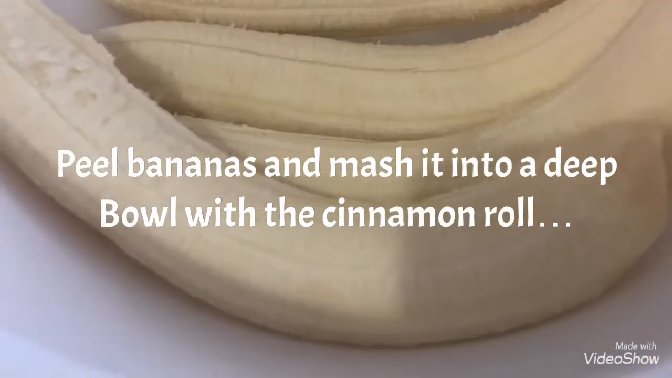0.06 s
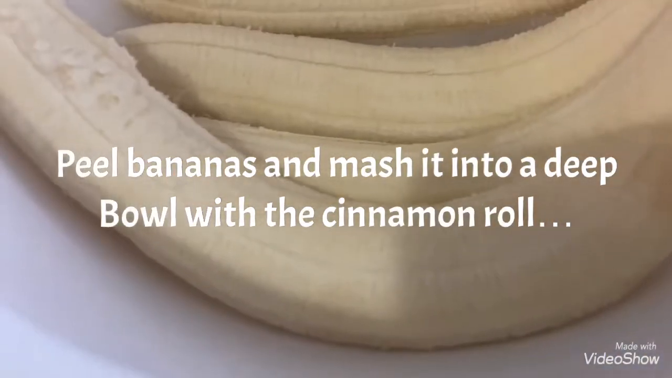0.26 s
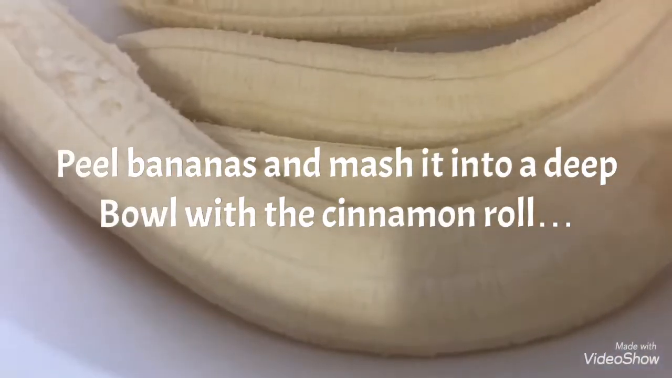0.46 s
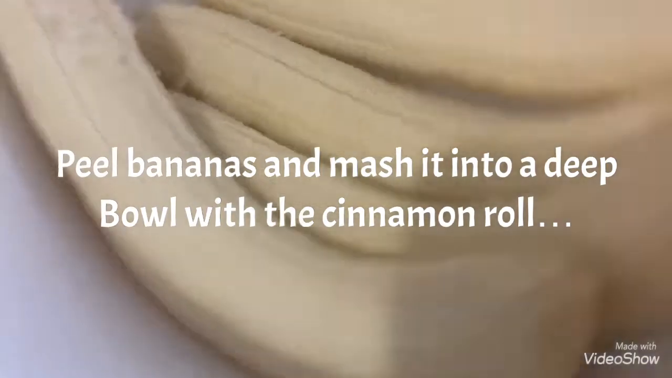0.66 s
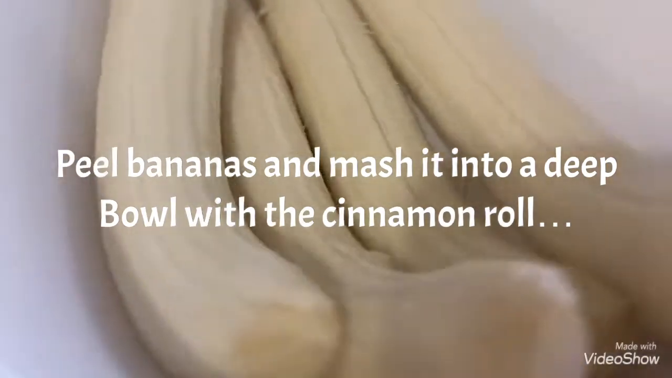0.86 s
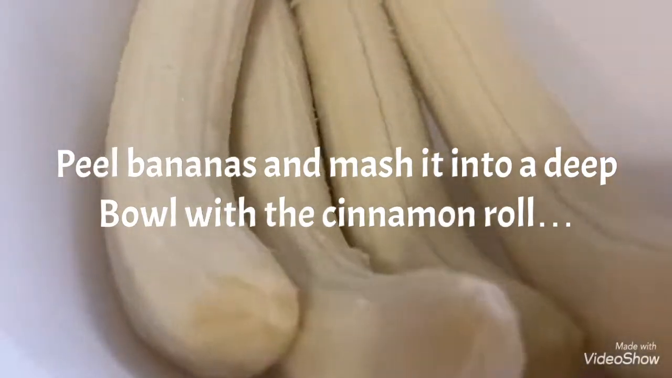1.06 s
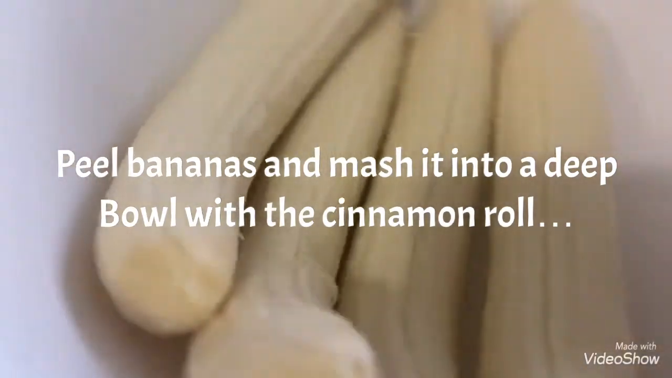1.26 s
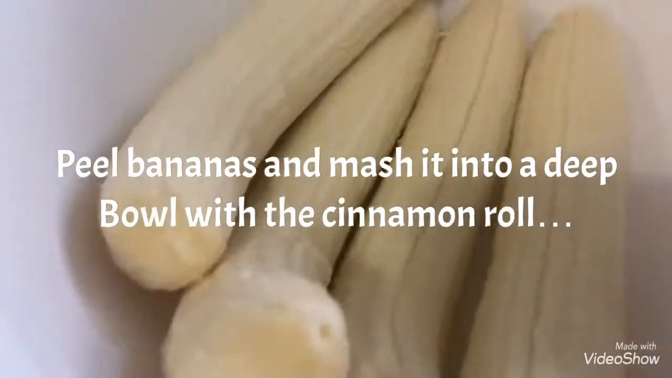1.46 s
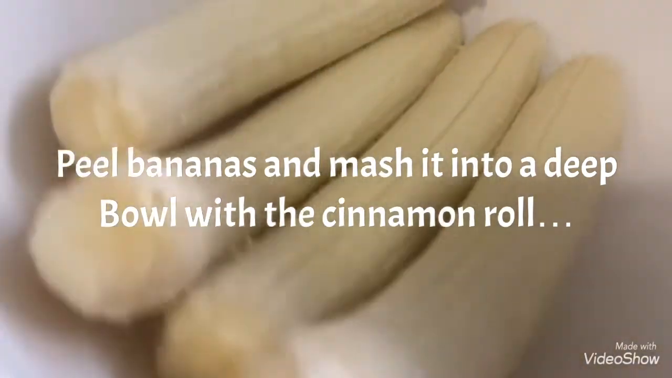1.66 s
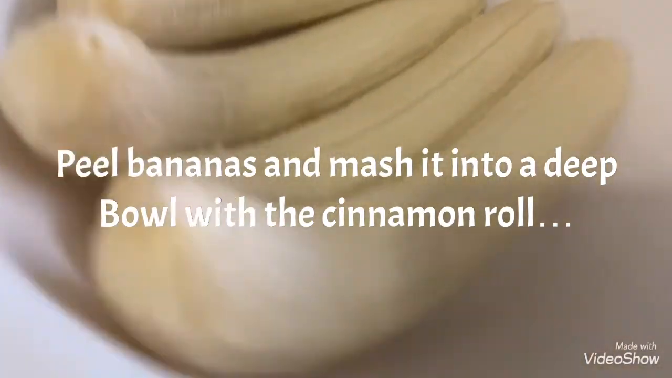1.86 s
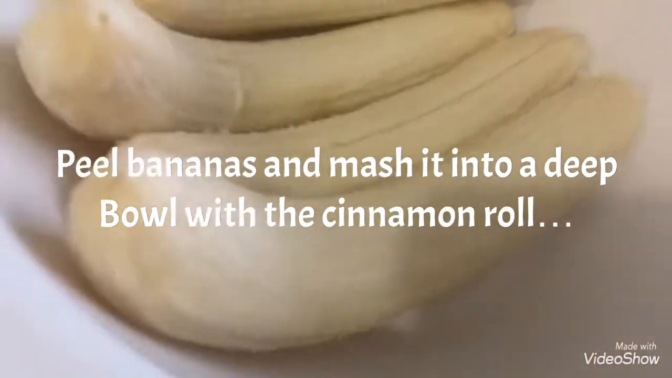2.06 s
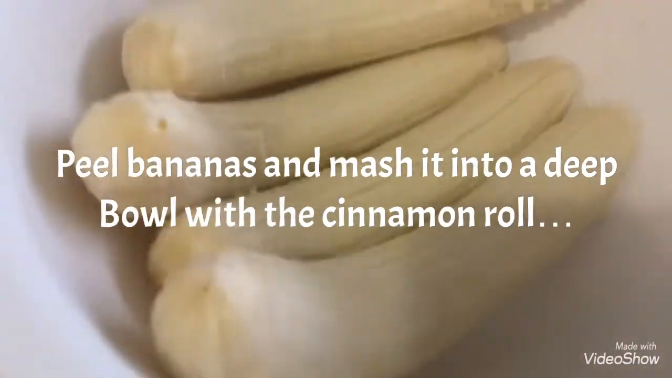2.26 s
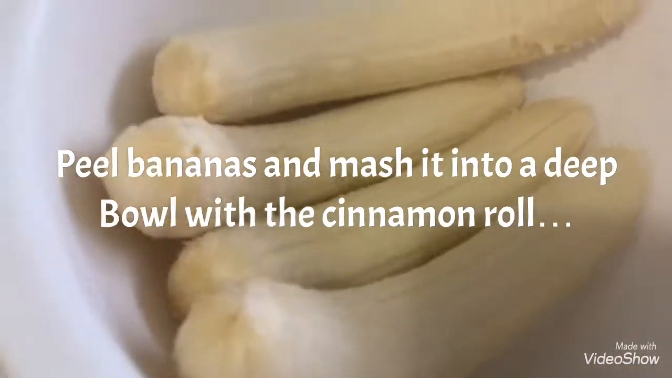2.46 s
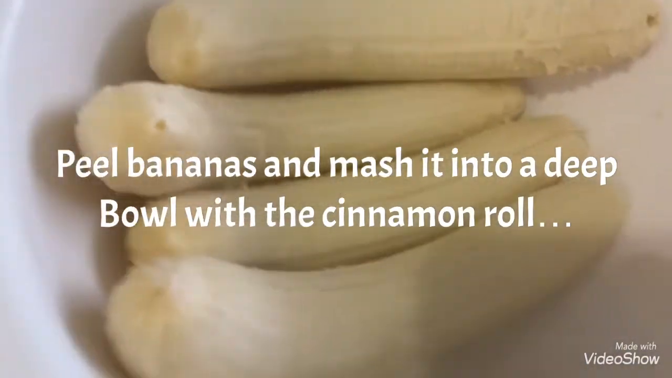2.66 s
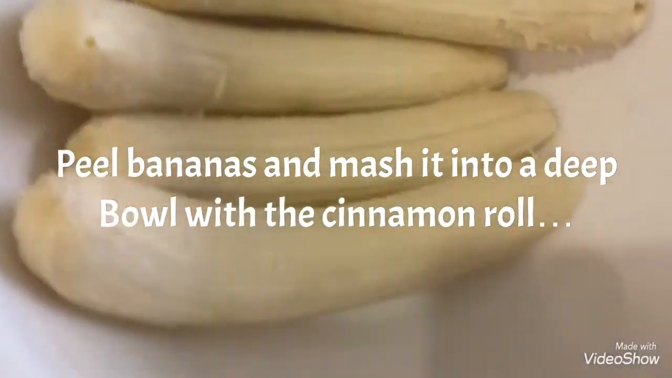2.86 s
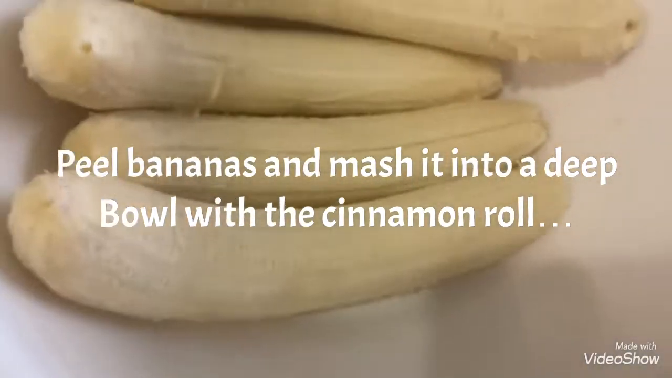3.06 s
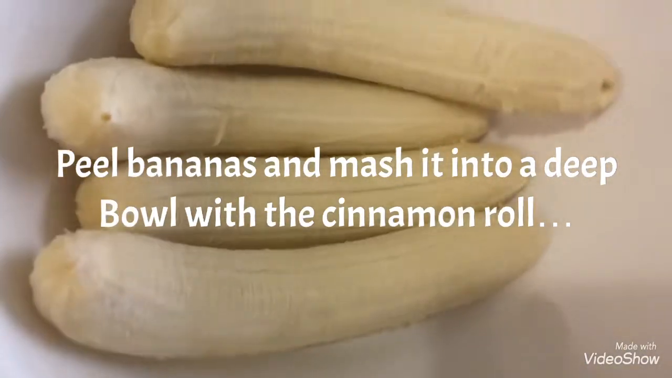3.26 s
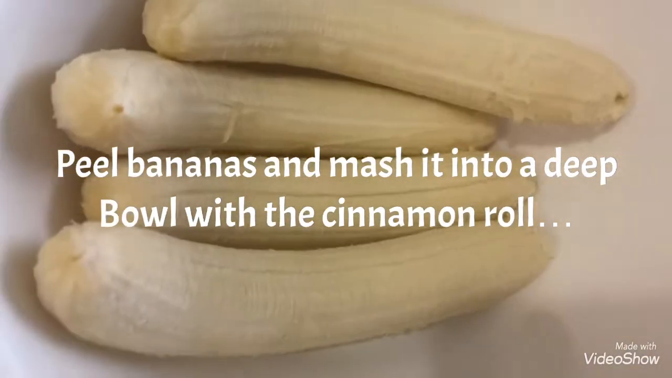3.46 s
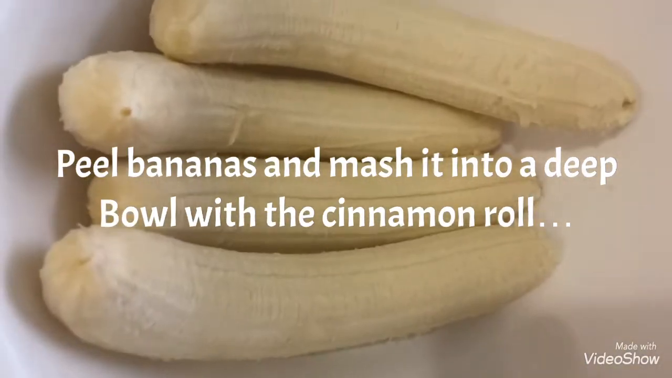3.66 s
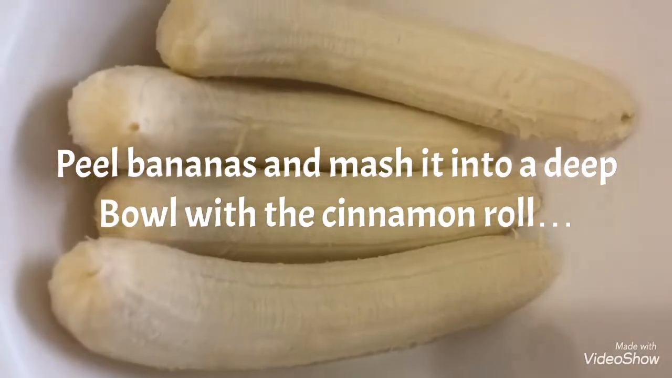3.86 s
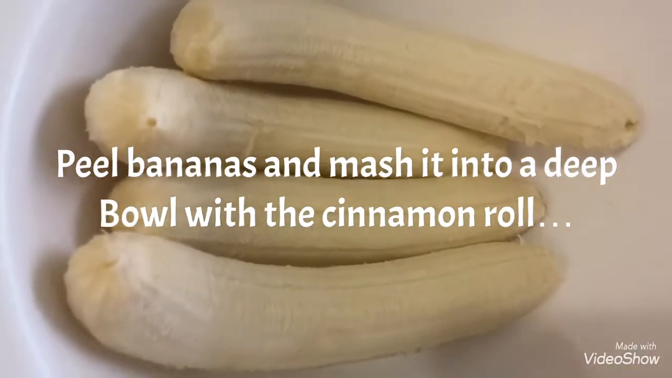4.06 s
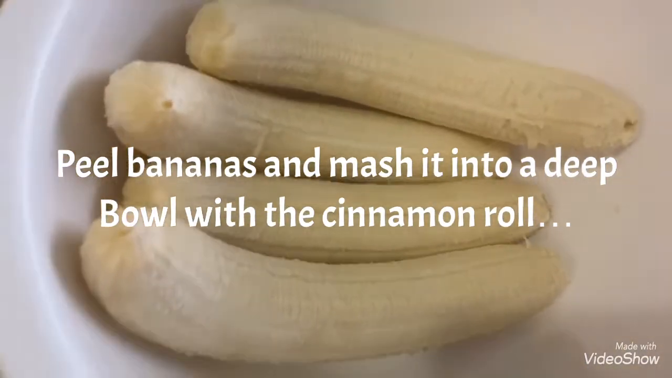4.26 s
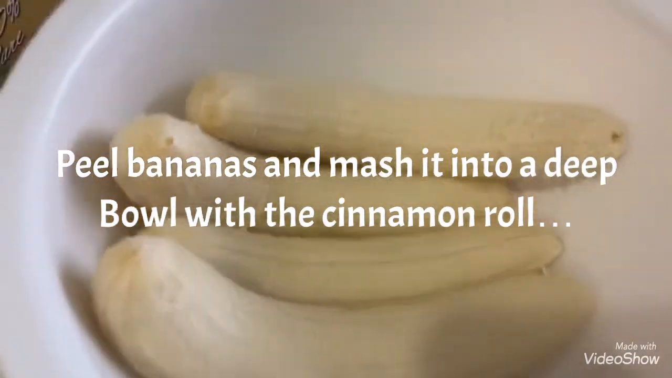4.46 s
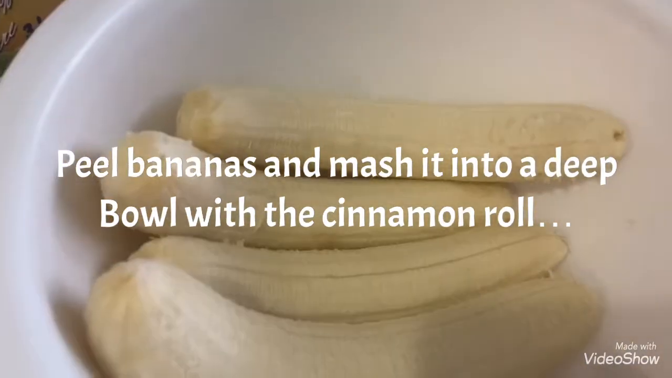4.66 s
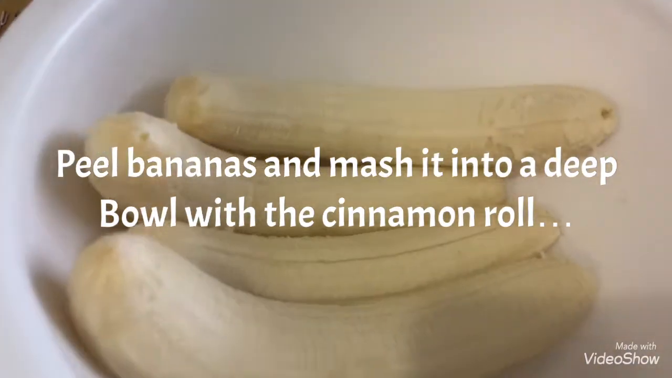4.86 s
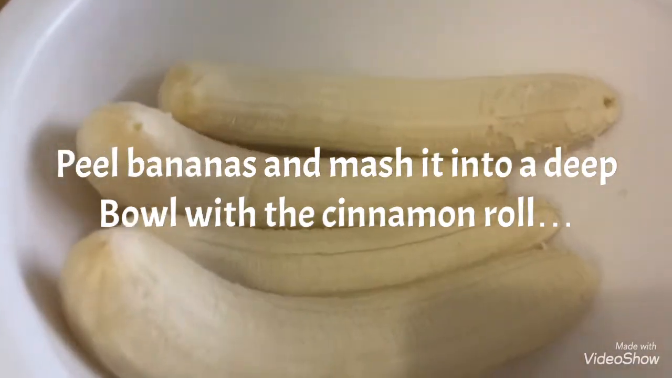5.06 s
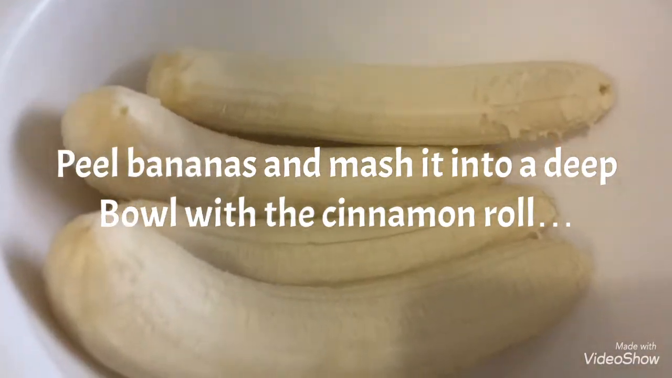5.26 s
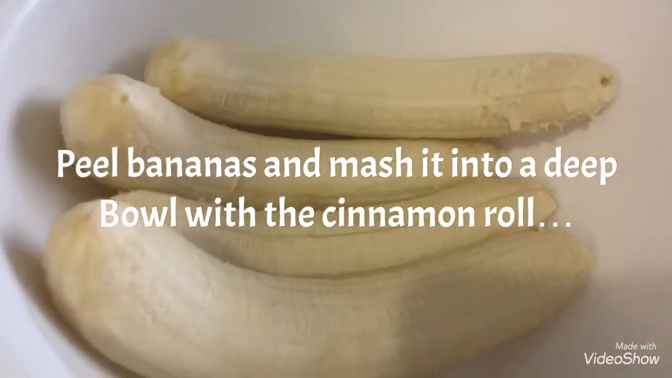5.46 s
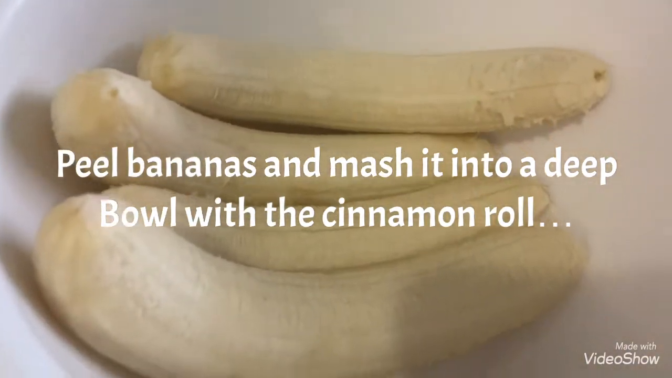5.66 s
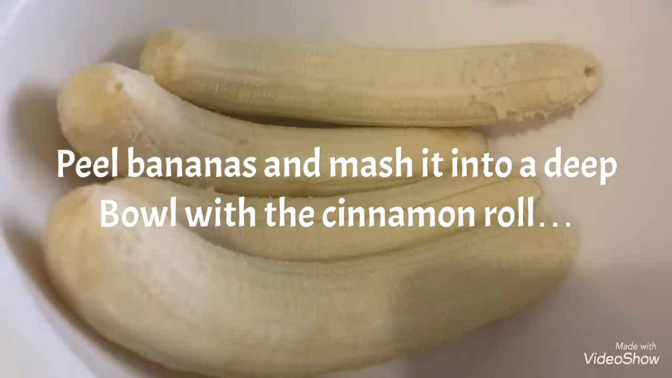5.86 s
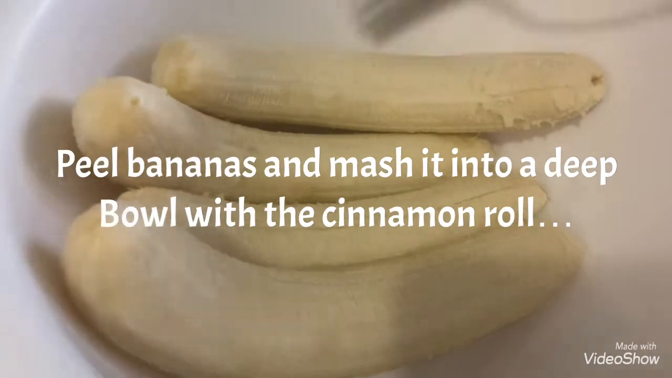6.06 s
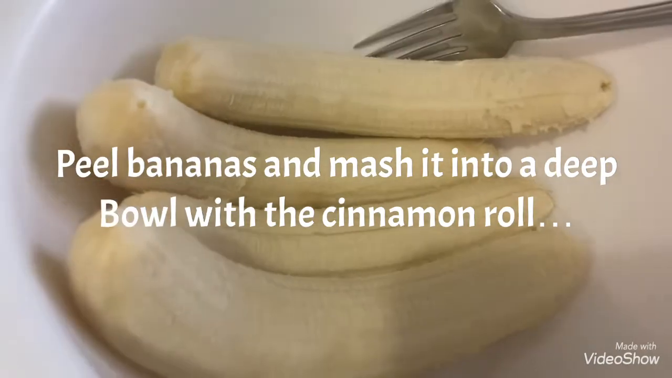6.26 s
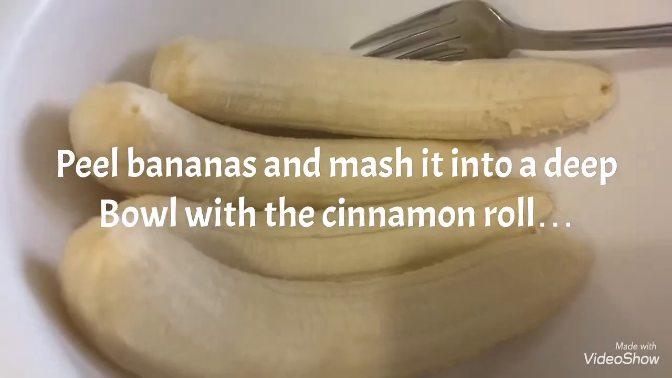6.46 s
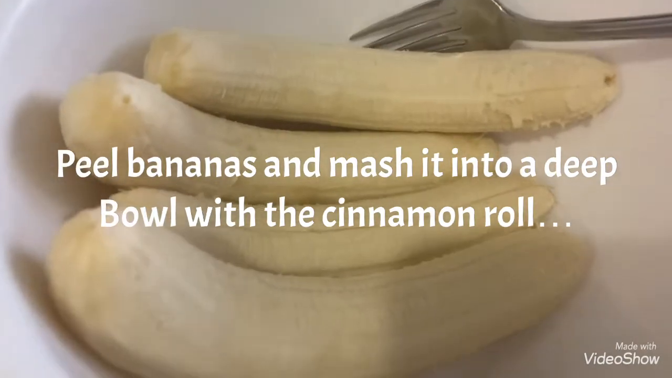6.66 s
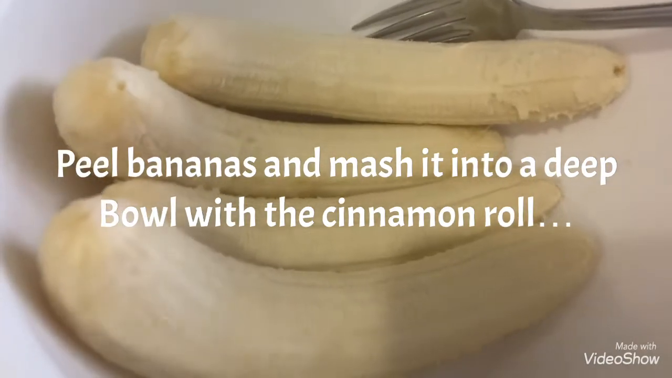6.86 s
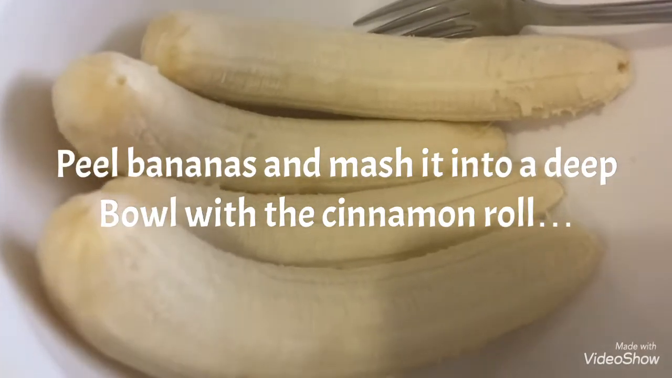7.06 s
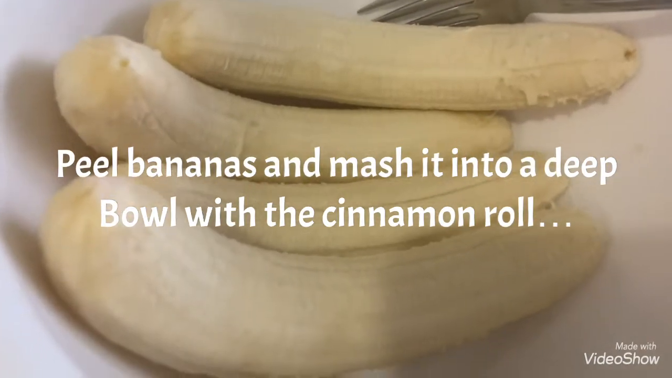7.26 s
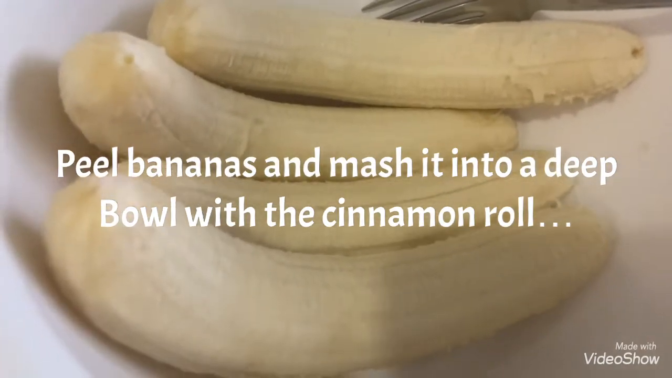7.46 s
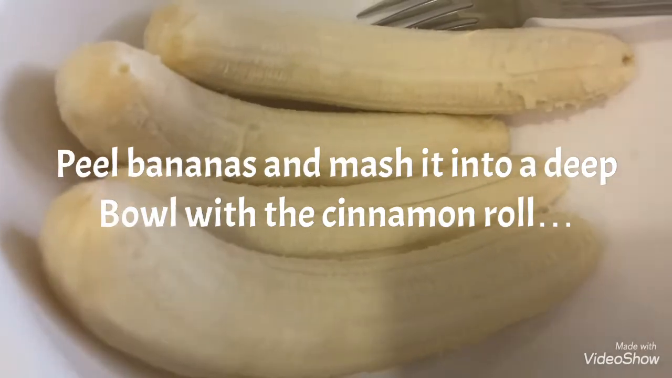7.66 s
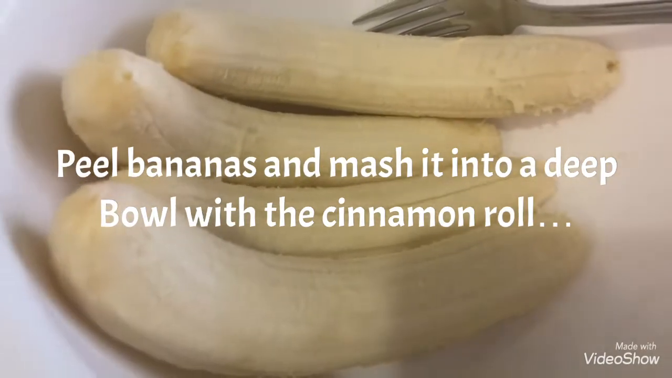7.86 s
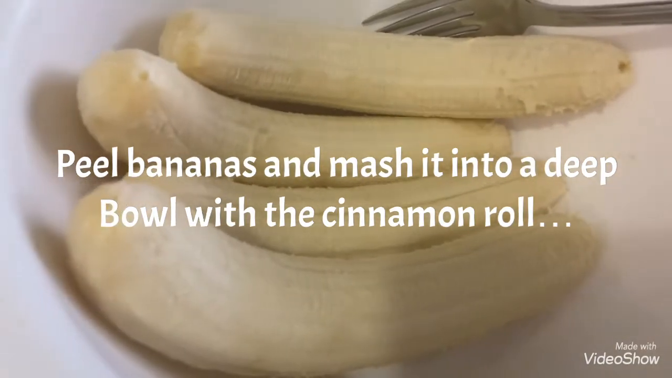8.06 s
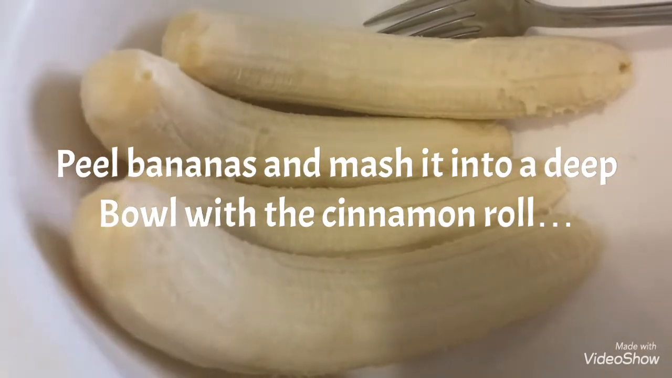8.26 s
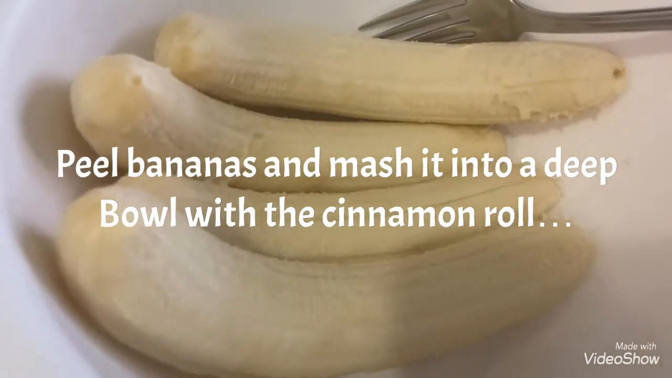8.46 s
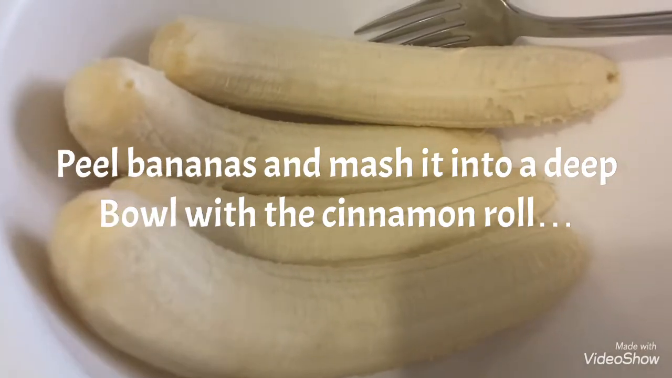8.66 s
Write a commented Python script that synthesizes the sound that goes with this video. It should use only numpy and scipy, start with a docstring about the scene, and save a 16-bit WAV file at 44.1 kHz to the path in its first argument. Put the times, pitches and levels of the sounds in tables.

```python
"""A light bowl is turned and slid on a kitchen counter under a hand-held phone, then a fork is laid in it.
Blows and a stick-slip judder sum a snap, damped bowl modes, a hollow note and a late low note, with echoes;
sliding grit is noise through the same bowl modes, and skin rustle and puffs of hiss are brighter noise.
Underneath lie coloured-noise room rumble and a wandering, refrigerator-like motor hum, heard in stereo."""
import sys
import numpy as np
from scipy import signal
from scipy.fft import rfft, irfft
from scipy.io import wavfile
from scipy.ndimage import uniform_filter1d

SR = 44100
rng = np.random.default_rng(int(sys.argv[2]) if len(sys.argv) > 2 else 0)


def generate_wav(sig):
    """Save sig (samples, or channels by samples) to the path in sys.argv[1] as 16-bit PCM at SR."""
    pcm = np.round(np.clip(np.atleast_2d(sig).T, -1, 1) * 32767).astype(np.int16)
    wavfile.write(sys.argv[1], SR, pcm)


N = 384552  # samples
HZ = np.fft.rfftfreq(N, 1 / SR) + 1e-3  # the offset avoids dividing by zero


def undb(db):
    """Decibels to an amplitude factor."""
    return 10 ** (np.asarray(db) / 20)


def level(x, db):
    """Scale a sound to an RMS level."""
    return x * undb(db) / np.sqrt(np.mean(x ** 2))


def peak(x, db):
    """Scale a sound to a peak level."""
    return x * undb(db) / np.abs(x).max()


def along(table, column=1):
    """Read a table column on a log-frequency axis."""
    table = np.array(table, float)
    return np.interp(np.log(HZ), np.log(table[:, 0]), table[:, column])


def shape(x, gain):
    """Filter a sound by a gain at each frequency."""
    return irfft(rfft(x) * gain, N)


def walk(rate):
    """Random levels held about 1 / rate s and smoothed twice; spread near 1."""
    hold = int(SR / rate)
    steps = np.repeat(rng.standard_normal(N // hold + 1), hold)
    return 1.3 * uniform_filter1d(uniform_filter1d(steps, hold), hold)[:N]


def pair(x, likeness, lag=0.):
    """Two microphone ports hear a shared sound plus a part of their own; the left may lag by a phase."""
    likeness = np.clip(likeness, 0, 1)
    shared = np.sqrt(likeness) * rfft(x[0])
    own = np.sqrt(1 - likeness)
    left = irfft(shared * np.exp(-1j * lag) + own * rfft(x[1]), N)
    right = irfft(shared + own * rfft(x[2]), N)
    return np.array([left, right])


# motor tone and overtones: multiple, level_db (before flutter and port balance)
MOTOR_TONES = [(1, -50.5), (2, -65.5), (3, -64.5)]
MOTOR_HZ, MOTOR_WANDER_HZ, MOTOR_FLUTTER_DB = 122.1, 1.181, 2.5


def motor():
    """A motor tone with two overtones; one pitch wander moves all three, each level flutters alone."""
    phase = 2 * np.pi * np.cumsum(MOTOR_HZ + MOTOR_WANDER_HZ * walk(4.0)) / SR
    tones = 0
    for multiple, db in MOTOR_TONES:
        tones = tones + level(np.sin(multiple * phase), db) * undb(MOTOR_FLUTTER_DB * walk(3.1))
    return tones


# spectrum of the room noise: pitch_hz, density_db (per Hz, relative)
ROOM_SPECTRUM = [(20, -48.5), (33, -23), (44, 0), (60, -11), (90, -15.5), (140, -8.5), (220, -14),
                 (388, -12.5), (404, -27.5), (470, -16.5), (800, -26), (2800, -37), (3800, -42),
                 (7800, -55), (9000, -74.5)]
# motor lines and faint bands of hiss: pitch_hz, width_hz, level_db (before port balance)
HUM_BANDS = [(40.7, 0.44, -56), (63.7, 1.2, -55.5), (121.64, 5.8, -48.5), (252.4, 9.1, -62.5),
             (370.7, 6.9, -63), (978, 130, -70.5), (1230, 16, -73), (1774, 540, -67), (2660, 84, -87.5),
             (10480, 760, -94)]
# room noise at the two ports: pitch_hz, likeness (0-1), left_minus_right_db, left_lag_rad
PORT_STEREO = [(29.5, 1, 1.5, .05), (139, 0.91, -3, 0.49), (345, 0.46, -0.5, 0.62), (754, 0.67, -0.5, 1.92),
               (1500, 0.35, -2, 2.36), (2700, 0.6, 2, 5.65), (7500, 0.14, 0.5, 4.6)]
ROOM_DB = -46  # before the slow waver and port balance


def room():
    """Rumble and hiss are noise with a spectrum; narrow noise bands and motor tones make the hum."""
    likeness = along(PORT_STEREO)
    balance = undb(np.outer([.5, -.5], along(PORT_STEREO, column=2)))
    lag = along(PORT_STEREO, column=3)
    air = pair(rng.standard_normal((3, N)), likeness, lag)
    out = level(shape(air, undb(along(ROOM_SPECTRUM))), ROOM_DB) * undb(0.31 * walk(2.0))
    for hz, width, db in HUM_BANDS:
        out = out + level(shape(air, 1 / (1 + (2 * (HZ - hz) / width) ** 2)), db)
    tone = rfft(motor())
    out = out + np.array([irfft(tone * np.exp(-1j * lag), N), irfft(tone, N)])
    return shape(out, balance)


def tail(x, t60_s, db, rise_s, dull_hz):
    """Scattered reflections build up and decay, thin in the bass and unlike on the two sides."""
    t = np.arange(SR // 2) / SR
    walls = rng.standard_normal((2, len(t))) * undb(-60 * t / t60_s) * (1 - np.exp(-t / rise_s))
    walls = walls * undb(db) / np.sqrt(np.sum(walls ** 2, axis=1, keepdims=True))
    wet = signal.fftconvolve(x.mean(axis=0, keepdims=True), walls, axes=1)[:, :N]
    return shape(wet, 1 / (1 + 1j * HZ / dull_hz) / (1 - 180j / HZ))


# answers to the knocks, counter and fruit close by, then the walls:
# t60_s, level_db (before the tone filter), rise_s (build-up), dull_above_hz
REFLECTIONS = [(0.055, -10, 0.009, 5120), (.3, -13.5, 0.006, 3530)]


def reflections(struck):
    """Close surfaces and farther walls each answer the knocks with a decaying noise tail."""
    return sum(tail(struck, *row) for row in REFLECTIONS)


# the bowl turned by hand, one curve per stretch of pushing; some blows fall within:
# time_s, scrape_db (nominal), mode_centre_hz, rustle_db (before the left lean)
PUSH_CURVES = [
    [(.25, -79, 1100, -82.5), (.592, -48.5, 1970, -55), (.658, -53.5, 1640, -62.5), (.8, -55, 2000, -65),
     (.86, -46.5, 1890, -62), (.934, -63, 1120, -77), (1.028, -52, 1760, -64), (1.07, -47.5, 1510, -60)],
    [(1.12, -46, 1890, -53), (1.176, -53, 2200, -67), (1.21, -41, 2110, -60), (1.23, -41, 2120, -60),
     (1.238, -53.5, 1710, -65.5), (1.37, -62, 1300, -74), (1.43, -52, 1860, -56.5), (1.46, -48, 1720, -51)],
    [(1.5, -52, 1360, -58.5), (1.63, -50, 2160, -59.5), (1.748, -50, 1510, -56), (1.84, -54, 1330, -63.5),
     (1.922, -50, 1280, -66), (1.97, -47, 1260, -71), (2.008, -54, 1230, -70), (2.05, -40.5, 1390, -59)],
    [(2.16, -75, 1500, -73), (2.25, -49, 2370, -62.5), (2.38, -60.5, 1880, -69), (2.434, -48, 1870, -61.5),
     (2.51, -58, 1650, -64), (2.6, -55, 1740, -65), (2.808, -58.5, 1610, -72), (2.9, -73, 1720, -80),
     (3.1, -66, 1300, -91)],
    [(3.95, -89, 1500, -84), (4.12, -57.5, 1770, -75), (4.22, -58, 1980, -68.5), (4.3, -47, 1720, -64),
     (4.34, -48.5, 1920, -58)],
    [(4.4, -53, 1900, -69.5), (4.49, -56.5, 1700, -68), (4.56, -57, 1219, -71), (4.65, -59.5, 1340, -65),
     (4.68, -70, 1400, -72)],
    [(4.75, -62, 1600, -67), (4.8, -68, 1400, -81), (4.9, -73, 1500, -91)],
]
STILL_DB = -100


def pushing(column):
    """One control of the pushes over time; the hand is still before and after."""
    rows = np.concatenate(PUSH_CURVES)
    still = None if column == 2 else STILL_DB  # the mode centre simply keeps its end values
    return np.interp(np.arange(N) / SR, rows[:, 0], rows[:, column], left=still, right=still)


# rustle of skin during pushes: pitch_hz, density_db (per Hz, relative)
RUSTLE_SPECTRUM = [(2500, -26.5), (4500, -2), (7000, 1.5), (8800, -10), (11000, 0), (13200, -5),
                   (15000, -4), (16500, -24.5)]
# thinner, higher sound of the puffs: pitch_hz, density_db (per Hz, relative)
PUFF_SPECTRUM = [(3500, -26), (5500, -7), (7000, -4), (8800, -16), (11000, -4), (13200, -6), (15000, -5.5),
                 (16500, -27)]
# short bright puffs of faint hiss: middle_s, length_s, level_db (at the middle, before the left lean)
HISS_PUFFS = [(0.023, 0.14, -85), (5.21, 0.044, -80), (5.449, 0.39, -82), (5.9, .2, -83),
              (6.035, 0.072, -62.5), (6.132, 0.043, -68), (7.215, 0.19, -76), (7.452, .04, -74.5),
              (7.647, 0.21, -83), (7.8, 0.038, -75), (7.99, .04, -77), (8.13, 0.14, -64.5),
              (8.285, 0.1, -63.5), (8.462, 0.085, -66), (8.665, 0.25, -70)]
PUFF_EDGE_DB = 7  # fall of a puff from its middle to its ends


def rustle():
    """Skin on smooth surfaces makes fine, bright, uneven noise; puffs of hiss are thinner and higher."""
    t = np.arange(N) / SR
    puff_power = 0
    for middle_s, length_s, db in HISS_PUFFS:
        puff_db = db - PUFF_EDGE_DB * (2 * (t - middle_s) / length_s) ** 2
        puff_power = puff_power + undb(2 * puff_db)
    flicker_db = 2.0 * walk(180) + 1.1 * walk(35)
    fine = pair(rng.standard_normal((3, N)) * undb(flicker_db), 0.42)
    pushed = level(shape(fine, undb(along(RUSTLE_SPECTRUM))), 0) * undb(pushing(column=3))
    puffs = level(shape(fine, undb(along(PUFF_SPECTRUM))), 0) * np.sqrt(puff_power)
    return pushed + puffs


# how the bowl is held and where it is touched, from each time on:
# start_s, first_hz, first_gain_db, second_hz, second_gain_db, ring_stop_s, left_minus_right_db, pitch_factor
GRIPS = [(0, 3020, 5, 4100, 7, .005, 2, 1.01), (.85, 4100, 5, 5120, 2, .007, 8, 1.01),
         (.9, 1860, -1, 2464, 3, 0.0075, 4.5, 1), (1.3, 1860, -6, 2464, -1, 0.0057, 1.5, 0.94),
         (1.8, 2464, -5, 3020, 6.5, 0.0053, 1, 0.99), (2.03, 1560, -24, 3020, 8, 0.0074, 2, 1.01),
         (2.066, 2464, -3, 2050, -1, .006, 3, 1.04), (2.12, 2464, -12, 3020, 3, 0.0029, 4, 1.01),
         (2.2, 2464, 0, 1860, 1.5, 0.0044, 2, 0.93), (3.5, 2050, -5, 1560, 0.5, .005, 3.5, 1.01),
         (4.62, 1860, -7.5, 2130, 1.5, 0.0062, 6, 1.05), (4.72, 2464, -8, 1560, 18.5, 0.0049, 7, 0.99),
         (5.5, 5180, -10, 4230, 4.5, .007, 4, .99), (6.028, 4230, -7, 5180, 2, .007, 3, 0.98),
         (6.043, 2176, -8, 3210, 7, .007, 2, 1), (6.1, 2500, 2, 1700, 3, 0.0059, 7, 0.98)]
HOLD_OCTAVES = .12  # reach of each gain change around its pitch


def held(f, s):
    """Gain of a mode under the hold at time s, with that hold's ring time, side and pitch factor."""
    rows = np.array(GRIPS)
    near = lambda hz: np.exp(-(np.log2(f / hz) / HOLD_OCTAVES) ** 2)
    gain = undb(rows[:, 2] * near(rows[:, 1]) + rows[:, 4] * near(rows[:, 3]))
    k = np.maximum(np.searchsorted(rows[:, 0], s) - 1, 0)
    return gain[k], rows[k, 5], rows[k, 6], rows[k, 7]


def favour(f, centre_hz, narrow_db):
    """The point of contact favours modes near its centre, and cuts lower ones more steeply."""
    octaves = np.log2(f / centre_hz)
    return undb(-narrow_db * octaves ** 2 * np.where(octaves < 0, 2.5, 1))


# broad grind of the grit: pitch_hz, density_db (per Hz, relative)
GRIT_SPECTRUM = [(300, -3), (700, 16), (1300, -3.5), (2200, -26), (3300, 6.5), (5000, -11.5), (8000, -39)]
# modes of the bowl, also used by tone bursts and knocks: pitch_hz, width_hz (nominal), level_db (relative)
BOWL_MODES = [(704, 56, -15), (830, 41, -14), (1082, 130, -11.5), (1268, 89, 0.5), (1560, 90, -1),
              (1860, 200, -6), (2050, 170, 2.5), (2464, 190, 0), (3020, 110, -9.5), (3536, 150, -14.5),
              (4100, 390, -10), (5120, 186, -14.5), (6540, 180, -16), (7670, 240, -17.5), (10210, 610, -18),
              (12800, 360, -19)]
GRIT_SWELL_DB = 1.3


def scrape():
    """Dense uneven grit under the bowl's foot rings its modes over a broad grind."""
    loud_db, centre = pushing(column=1), pushing(column=2)
    firm = np.clip((loud_db + 48.5) / 14, 0, 1)  # a firm push rings few modes steadily, a light one grinds
    flicker_db = 2.3 * walk(150) + GRIT_SWELL_DB * walk(35)
    grit = pair(rng.standard_normal((3, N)) * undb(flicker_db), 0.37)
    t = np.arange(N) / SR
    rung, power = 0, 0
    for f, width, mode_db in BOWL_MODES:
        # the shifting grip lets each mode come and go
        grip_db = 0.61 * (4.5 - 0.81 * firm) * walk(22)
        weight = held(f, t)[0] * undb(mode_db + grip_db) * favour(f, centre, 14 + 40 * firm)
        resonance = 1 / (1 + 2j * (HZ - f) / (3.16 * width)) ** 2
        rung = rung + weight * level(shape(grit, resonance), 0)
        power = power + weight ** 2
    grind = level(shape(grit, undb(along(GRIT_SPECTRUM))), -4) * undb(-8 * firm)
    return (rung / np.sqrt(power) + grind) * undb(loud_db)


# short bursts of bowl tone, catches of the foot and lingering ring after a knock:
# middle_s, length_s, centre_hz, level_db (at the middle, before the left lean)
TONE_BURSTS = [(0.499, 0.059, 2410, -58), (0.551, 0.062, 3500, -60), (0.577, .04, 4100, -62),
               (0.596, 0.016, 2050, -56), (0.7, 0.052, 830, -49.5), (0.703, 0.034, 2500, -51),
               (1.199, 0.0087, 2340, -41), (1.216, 0.019, 2050, -31.5), (1.219, 0.043, 740, -41.5),
               (1.217, 0.042, 4100, -56.5), (1.225, 0.015, 2500, -43), (1.487, 0.01, 1290, -41),
               (1.512, .02, 1290, -45), (1.629, 0.11, 2400, -55), (1.758, 0.044, 2720, -53.5),
               (1.902, 0.023, 1270, -43), (0.867, 0.018, 5120, -55), (0.867, 0.016, 6540, -58),
               (1.216, .04, 6540, -61), (4.379, 0.022, 704, -50), (2.078, .02, 1900, -46),
               (2.113, 0.037, 1090, -53), (2.255, 0.013, 2700, -48.5), (2.431, 0.026, 2070, -55),
               (2.578, 0.083, 1860, -57), (2.547, .12, 2550, -64), (2.55, .12, 1560, -58.5),
               (2.623, 0.019, 1860, -52)]
BURST_NARROW_DB, BURST_EDGE_DB = 90, 10  # per octave squared above the centre; fall to a burst's ends


def tone_bursts():
    """Each burst is swelling noise through the bowl's modes near its centre."""
    out = np.zeros((2, N))
    t = np.arange(-2048, 2048) / SR
    hz = np.fft.rfftfreq(4096, 1 / SR)
    chance = rng.standard_normal((len(TONE_BURSTS), 3, len(t)))
    for (s, length, centre_hz, db), (shared, own_left, own_right) in zip(TONE_BURSTS, chance):
        modes = 0
        for f, width, _ in BOWL_MODES:
            resonance = 1 / (1 + 2j * (hz - f) / (1.2 * width)) ** 2
            modes = modes + favour(f, centre_hz, BURST_NARROW_DB) * resonance
        noise = irfft(rfft(shared + 0.58 * np.array([own_left, own_right])) * modes)
        swell = undb(-BURST_EDGE_DB * (2 * t / length) ** 2)
        i = int(s * SR) - len(t) // 2
        out[:, i:i + len(t)] += level(noise * swell, db) * np.sqrt(np.mean(swell ** 2))
    return out


def ring(t, hz, width_hz, rise_s, turn):
    """A damped mode that swells over rise_s; the ports catch it at phases +-turn in radians."""
    t = np.maximum(t, 0)
    swell = (1 - np.exp(-t / rise_s)) ** 2
    return swell * np.exp(-np.pi * width_hz * t) * np.sin(2 * np.pi * hz * t + np.array([[turn], [-turn]]))


# fork against the bowl: pitch_hz, width_hz (nominal), level_db (relative)
FORK_MODES = [(1270, 100, -3.5), (1700, 185, 2.5), (2176, 130, -2.5), (2500, 99, -6), (2750, 130, -7.5),
              (3210, 160, -3.5), (3550, 160, -12), (4230, 230, -14), (5180, 220, -17), (7000, 270, -14.5),
              (10650, 400, -21)]
# blows, and the quick stick-slip judder at 1.88-1.97 s; peak levels before the left-right balance:
# start_s, clack_db, clack_centre_hz, hollow_db, hollow_hz, low_note_db, low_note_hz, tick_db
KNOCK_ROWS = [(0.825, -28, 2100, -32, 657, -35, 124, -32), (0.865, -46, 1950, -44, 490, -32.5, 102, -41),
              (0.967, -38.5, 1620, -28, 570, -49, 116, -68), (1.0819, -4.5, 2190, -22, 606, -15, 321, -14),
              (1.085, -16.5, 2410, -44, 401, -10, 230, -39), (1.097, -17.5, 2470, -36, 408, -27.5, 74, -30),
              (1.1009, -18, 2000, -34, 416, -20, 190, -30), (1.2098, -35, 2050, -45, 750, -52, 124, -52),
              (1.2292, -30, 1900, -31.5, 676, -31, 123, -52), (1.3481, -45, 1230, -38, 610, -59, 118, -69),
              (1.4675, -7, 1720, -15.5, 633, -20.5, 210, -37.5),
              (1.5301, -23, 1660, -37, 795, -28, 128, -46), (1.738, -34, 1250, -51, 810, -38, 122, -41),
              (1.879, -39, 1600, -52, 400, -37, 300, -55), (1.9105, -36, 1500, -55, 466, -37, 242, -46),
              (1.9153, -34, 1400, -59, 466, -39, 242, -60), (1.9214, -34, 1400, -59, 466, -33, 260, -60),
              (1.93, -29, 1180, -39, 455, -43, 127, -65), (1.9364, -38, 1500, -50, 455, -36, 260, -60),
              (1.952, -41, 1500, -47, 800, -40, 260, -62), (1.9642, -42, 1700, -41, 800, -45, 260, -60),
              (1.9693, -37, 1700, -37, 800, -32, 263, -60),
              (2.061, -8.5, 1290, -14.5, 775, -23, 290, -21.5),
              (2.071, -24.5, 2100, -28.5, 500, -30, 315, -39),
              (2.0888, -25.5, 1250, -28, 830, -28, 114, -43),
              (2.139, -16, 1810, -19.5, 653, -28, 184, -26.5),
              (2.2468, -43, 2800, -35.5, 595, -37, 110, -46), (2.307, -33.5, 2070, -59, 738, -40, 108, -48),
              (2.3525, -40, 2200, -56, 465, -53, 151, -50), (2.4169, -41, 1860, -39, 470, -34.5, 189, -44),
              (4.349, -26.5, 1210, -11, 603, -29, 316, -35.5), (4.353, -48, 1200, -22, 665, -37, 325, -60),
              (4.3577, -35, 2060, -43, 536, -29, 94.2, -47), (4.391, -32, 1140, -28, 590, -36, 145, -64),
              (4.574, -36, 1210, -37, 537, -33, 102, -49), (4.591, -35.5, 1460, -50, 466, -39, 120, -43),
              (4.694, -16.5, 1700, -25.5, 660, -23, 216, -26),
              (4.7016, -55, 1880, -24, 664, -26.5, 322, -54),
              (4.7279, -24.5, 3290, -19.5, 630, -25.5, 74.5, -36),
              (6.0012, -16.5, 2050, -28.5, 470, -38, 320, -30),
              (6.006, -17, 1800, -29.5, 466, -24.5, 204, -27), (6.0127, -32, 1400, -26, 470, -32, 206, -48),
              (6.0343, -23, 2700, -31, 460, -47, 146, -31), (6.048, -30, 1730, -28.5, 500, -29.5, 72, -38),
              (6.1335, -25.5, 1560, -24.5, 490, -42, 125, -45), (6.265, -48, 1210, -38, 466, -57, 121, -76),
              (6.2765, -50, 1750, -39, 485, -38, 121, -78), (6.293, -58, 1500, -39, 477, -49, 120, -76)]
FORK_FROM_S, TICK_FROM_HZ = 5.9, 3400
MODE_SCATTER_DB = 1.5  # chance spread of mode levels from row to row
# snap level = tick level + SNAP_DB + a share of the clack level
SNAP_DB, SNAP_PER_CLACK = 6.5, 1.4
LOW_PAN_DB, LOW_PAN_HZ = -5, 1700  # modes below this pitch radiate more to the right


def knocks():
    """Blows and judder: a snap, a tick of high modes, the clack, its hollow note and a late low note."""
    out = np.zeros((2, N))
    t = np.arange(SR // 8) / SR
    chance = rng.standard_normal((len(KNOCK_ROWS), len(BOWL_MODES), 3))
    crack_band = signal.butter(3, [8800, 14000], "band", fs=SR, output="sos")
    cracks = signal.sosfilt(crack_band, rng.standard_normal((len(KNOCK_ROWS), len(t))))
    for row, draw, crack in zip(KNOCK_ROWS, chance, cracks):
        s, clack_db, clack_hz, hollow_db, hollow_hz, low_db, low_hz, tick_db = row
        clack, tick = 0, 0
        struck = FORK_MODES if s > FORK_FROM_S else BOWL_MODES
        for (f, width, mode_db), (size, detune, turn) in zip(struck, draw):
            hold, choke_s, pan_db, tune = held(f, s)
            f = f * tune * (1 + .008 * detune)
            # bending waves in the thin wall carry the highs ahead of the lows
            mode = ring(t - 0.47 / f, f, 0.8 * width, 0.49 / f, 0.25 + 0.16 * turn)
            mode = mode * hold * undb(mode_db + MODE_SCATTER_DB * size) * np.exp(-(t / choke_s) ** 2)
            low_pan_db = LOW_PAN_DB / (1 + (f / LOW_PAN_HZ) ** 6)
            clack = clack + favour(f, clack_hz, 7.3) * mode * undb(np.array([[.5], [-.5]]) * low_pan_db)
            tick = tick + (f > TICK_FROM_HZ) * mode * np.exp(-t / 0.0079)
        hollow = ring(t - .0008, hollow_hz, 0.17 * hollow_hz, 0.00033, 0.32)
        hollow = hollow * np.exp(-(t / (1.6 * choke_s)) ** 2)
        low_note = ring(t - .0022, low_hz, 0.26 * low_hz, 0.00061, 0.027)
        snap = crack * np.exp(-t / 0.0021)
        snap_db = tick_db + SNAP_DB + SNAP_PER_CLACK * clack_db
        sides = undb(np.array([[pan_db], [-pan_db]]) / 2)
        sided = sides * (peak(clack, clack_db) + peak(tick, tick_db) + peak(hollow, hollow_db))
        i = int(s * SR)
        out[:, i:i + len(t)] += sided + peak(low_note, low_db) + peak(snap, snap_db)
    return out


def scene():
    """Knocks and their reflections, the sliding bowl, rustle and room sum at the microphone."""
    struck = knocks()
    left = undb([[1.2], [-1.2]])  # the bowl stands a little to the left
    sliding = left * (scrape() + tone_bursts() + rustle())
    return struck + reflections(struck) + sliding + room()


SPLIT_HZ, TOP_LAG = 9000, 10  # treble shared above this pitch; left lag in samples
TOP_HZ, HEADROOM = 16000, 1.5  # cut-off; amplitude that rounded peaks approach before the cut


def record(dry):
    """The highest treble is one feed, inverted and late on the left; peaks are rounded, the top is cut."""
    high = 1 / (1 + (SPLIT_HZ / HZ) ** 24)
    top = shape(dry.mean(axis=0), high)
    wet = shape(dry, 1 - high) + np.array([-np.roll(top, TOP_LAG), top])
    rounded = HEADROOM * np.tanh(wet / HEADROOM)
    return signal.sosfilt(signal.ellip(8, .2, 70, TOP_HZ, fs=SR, output="sos"), rounded)


dry = scene()
out = record(dry)
generate_wav(out)
```